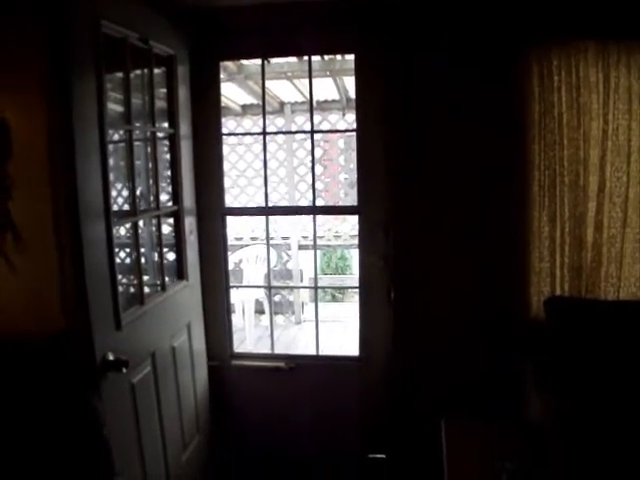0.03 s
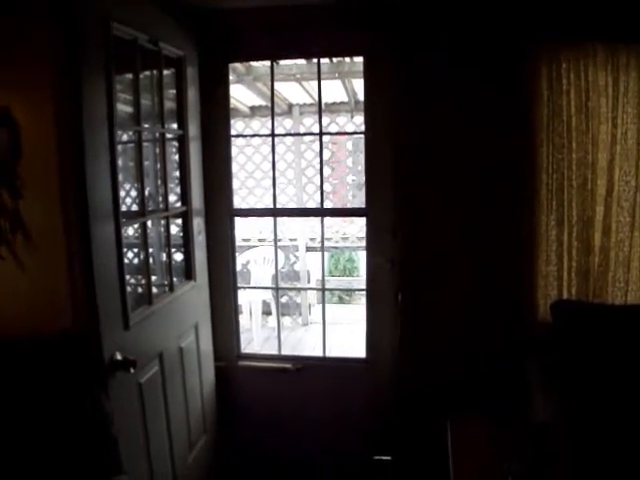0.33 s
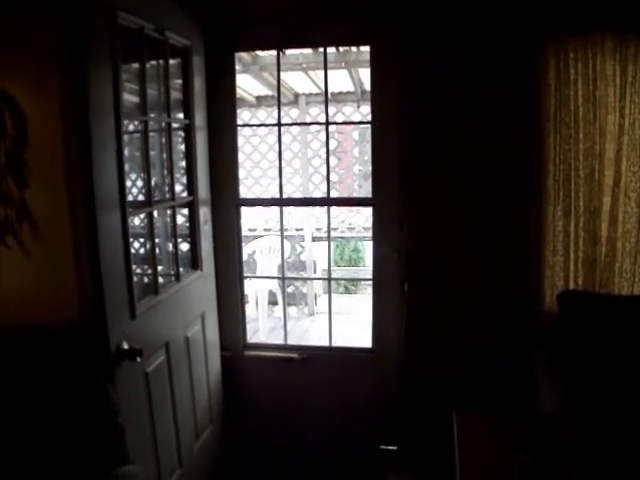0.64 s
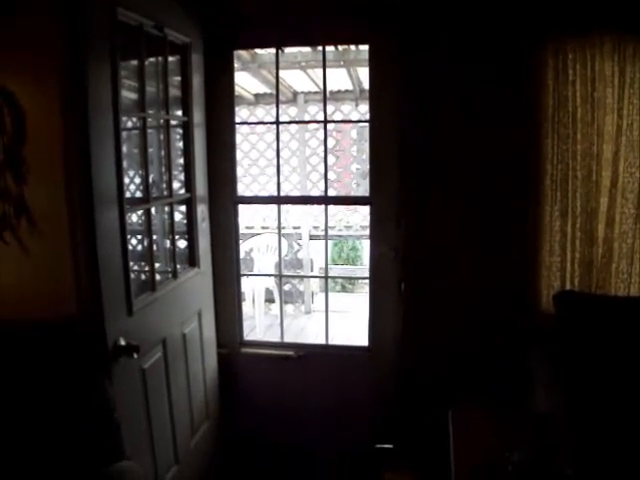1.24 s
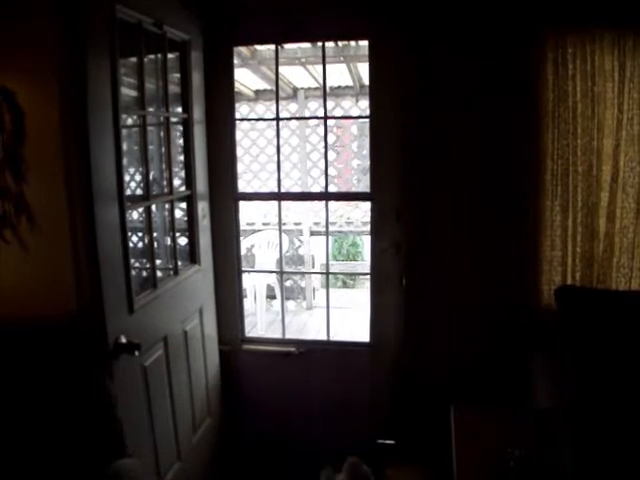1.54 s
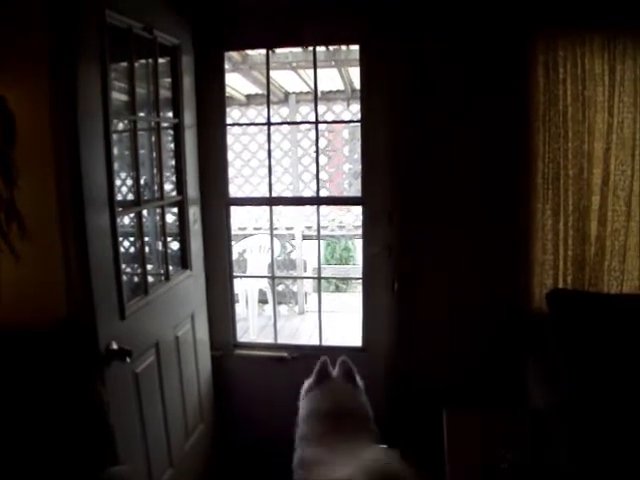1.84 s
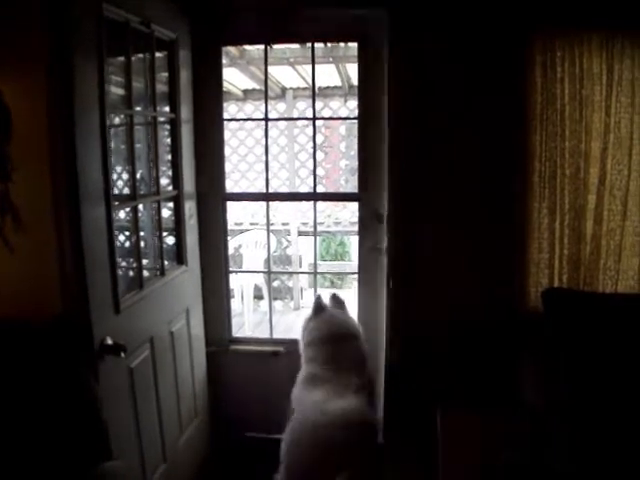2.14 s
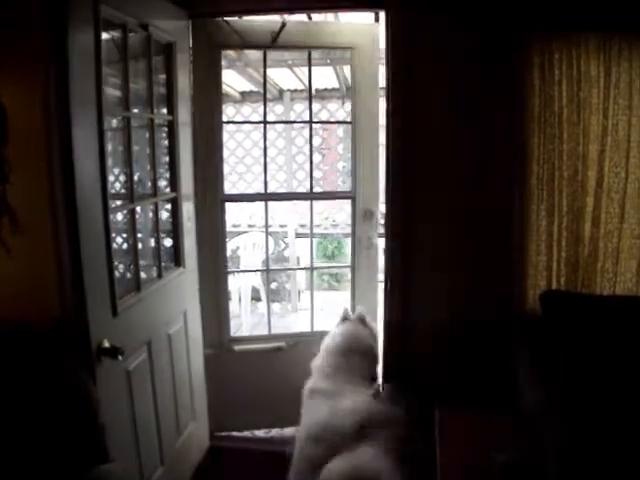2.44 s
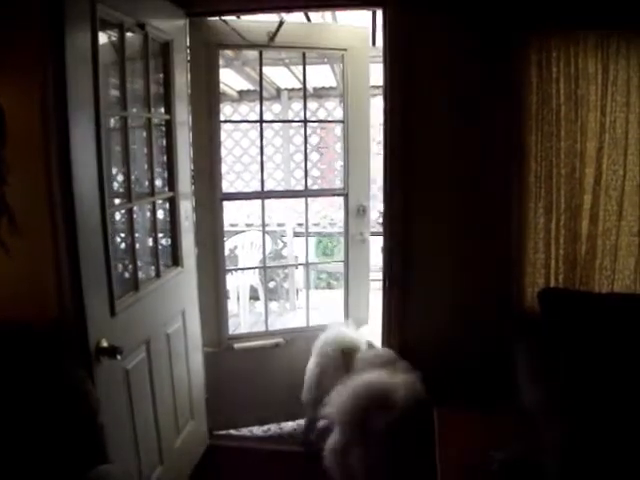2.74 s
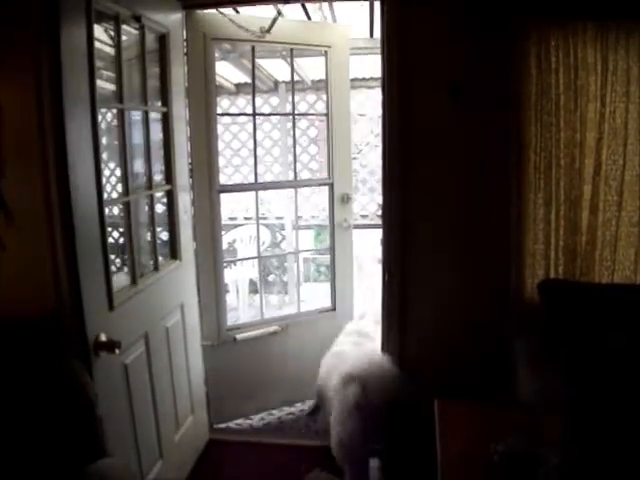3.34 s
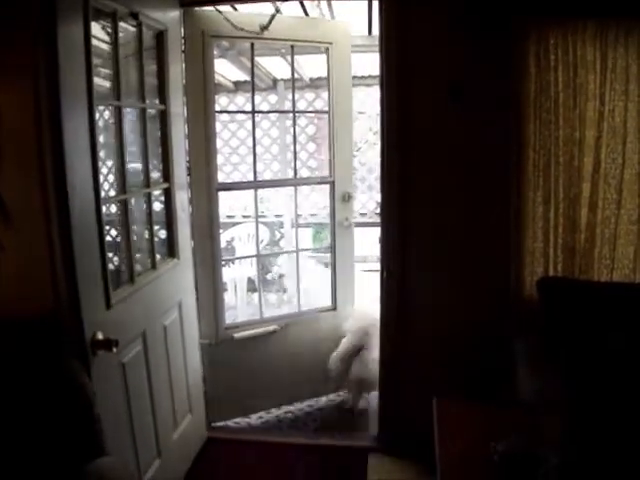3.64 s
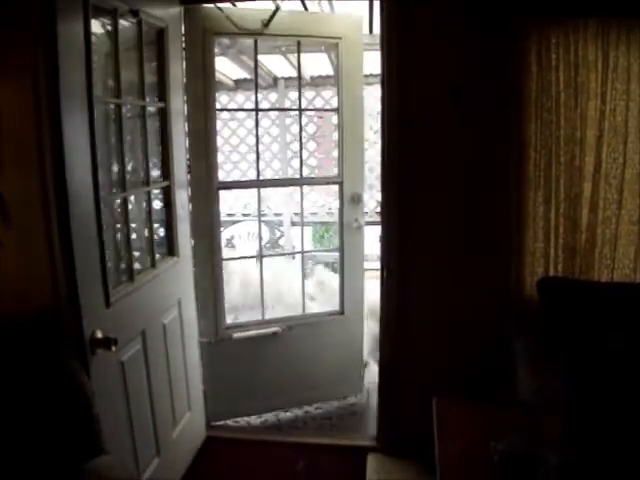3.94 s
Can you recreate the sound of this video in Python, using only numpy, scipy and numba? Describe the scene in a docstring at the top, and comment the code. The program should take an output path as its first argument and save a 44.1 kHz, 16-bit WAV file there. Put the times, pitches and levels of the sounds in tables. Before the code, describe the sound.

A storm door unlatches and rattles as a dog squeezes through, across a quiet room.

```python
"""A dog pushes a glass storm door open and squeezes out, heard from across a quiet room.
First the room's air booms and rumbles, a hand-held camera hisses and ticks, and the dog steps softly.
At 2 s the latch lets go. Frame and pane clack and rattle, the door closer hisses and squeaks, and the
boom rises in pitch as the door opens. Paws scuff the sill. Near 3.6 s a camera button snaps twice.
The sharpest peaks overload the camera."""
import sys
import numpy as np
from scipy import signal
from scipy.fft import rfft, irfft
from scipy.io import wavfile
from scipy.ndimage import uniform_filter1d
from numba import njit

SR = 44100
rng = np.random.default_rng(int(sys.argv[2]) if len(sys.argv) > 2 else 0)


def store_wav(level_fs):
    """Save 16-bit WAV to argv[1]."""
    pcm = np.round(np.clip(np.atleast_2d(level_fs), -1, 1) * 32767)
    wavfile.write(sys.argv[1], SR, pcm.T.astype(np.int16))


N = 176400  # 4 seconds

# The deepest note of the room's air: time_s, pitch_hz, level_db
AIR_NOTE = [(0, 37.97, -23), (.46, 38.63, -16.5), (.8, 38.67, -21.5), (.97, 38.7, -27.5), (1.1, 38, -20),
            (1.34, 38.35, -26), (1.47, 39.2, -15.5), (1.6, 38.15, -34.5), (1.92, 38.44, -17),
            (2.03, 38.4, -26), (2.18, 38.1, -13), (2.35, 38.6, -22), (2.44, 40.99, -14),
            (2.85, 41.58, -11.5), (3.15, 43.33, -14), (3.47, 44.96, -16), (3.6, 46.1, -39),
            (4, 45.4, -29.5)]
# How loud each lasting sound is over time: time_s, level_db
RUMBLE_LEVELS = [(0, -29), (.9, -31.5), (1.15, -21.5), (1.4, -21.5), (1.7, -19), (2, -15.5), (2.5, -20),
                 (3.05, -17), (3.55, -24.5), (3.95, -19)]
DRAUGHT_LEVELS = [(1.9, -23.5), (2.1, -11), (2.4, -15.5), (2.7, -28.5), (2.95, -8.5), (3.4, -24),
                  (4, -26.5)]
CLOSER_LEVELS = [(2.25, -57.5), (2.45, -31.5), (2.6, -31.5), (2.8, -26), (2.94, -46.5), (3.1, -32.5),
                 (3.3, -26.5), (3.45, -46.5), (3.6, -45)]
PUSH_LEVELS = [(0, -47), (1.5, -24), (1.95, -15), (2.05, -3.5), (2.3, -4), (2.5, 0), (2.8, 4.5),
               (2.93, 3.5), (3.25, 2), (3.45, -4.5), (3.65, -6.5), (3.78, -3.5), (4, -7.5)]  # how hard the door is moved

# The tone of each noise, from its lows to its highs: frequency_hz, gain_db
RUMBLE_TONE = [(8, -13), (21, 5.5), (30, -1), (50, -6.5), (75, -10), (110, -30), (200, -28), (400, -48),
               (2000, -87)]
MIC_HISS_TONE = [(60, 5), (130, 5), (210, -11.5), (260, -1), (400, -12.5), (900, -13), (1300, -12.5),
                 (1450, -4), (1600, -6), (2100, 1), (2400, -2.5), (2600, 5), (2800, 1), (2900, -3.5),
                 (3100, -5.5), (3350, -19), (3800, -18.5), (4100, -18), (4700, -17), (5400, -28.5)]
CASE_TONE = [(200, -25), (550, -23.5), (880, -7), (1200, -18), (1500, -3.5), (1900, -6), (2300, 6),
             (2800, -6), (3400, -23.5), (5000, -35)]
STEP_TONE = [(100, -8), (260, -10), (420, -10.5), (650, -8.5), (890, 2), (1100, -1.5), (1500, -8.5),
             (3000, -26)]
SCUFF_TONE = [(100, -7.5), (300, 1), (600, 0.5), (1000, -1.5), (1500, -7), (2700, 6.5), (3500, -5),
              (4500, -11.5), (5400, -17.5)]
CLOSER_TONE = [(1500, -27), (2500, -3.5), (3000, 4), (3600, 2), (4100, -17), (5300, -27.5)]
SHAKE_TONE = [(50, 12), (100, -4), (180, 0), (280, -10.5), (500, -9), (800, -11), (1100, -9.5),
              (1500, -13.5), (2700, -1), (3400, -18.5), (5300, -34.5)]
BOOM_TONE = [(30, -7), (60, -8), (90, 0), (135, 0), (195, -3.5), (260, -7.5), (400, -12.5), (900, -57)]
KNOCK_TONE = [(120, -29), (300, -11), (500, 7.5), (750, 0.5), (1100, 0), (1600, -6), (3000, -20.5)]
RATTLE_TONE = [(600, -31.5), (1000, -18.5), (1500, -14), (2000, -8), (2400, -5), (2800, 1), (3150, -3),
               (3600, -13), (4200, -17.5), (4600, -21.5), (5400, -27.5)]
FRAME_TONE = [(120, -21), (300, -2.5), (520, -6.5), (800, -5), (1100, 1.5), (1700, 7), (2300, 4),
              (3200, -32)]

# Small, short sounds: start_s, level_db
CASE_TICKS = [(.100, -33), (.192, -28.5), (.228, -22), (.358, -22.5), (.426, -32), (0.434, -19),
              (.735, -25), (.836, -23.5), (.988, -28), (1.310, -29), (1.411, -27), (1.677, -27),
              (1.712, -19)]
BUTTON_SNAPS = [(3.6263, 2.5), (3.6334, 2.5)]
PAW_STEPS = [(.100, -32), (.192, -36.5), (.360, -34.5), (.440, -46), (.718, -37.5), (.738, -33.5),
             (.840, -38), (.930, -34.5), (1.310, -31.5), (1.411, -34.5), (1.505, -35.5), (1.572, -30.5),
             (1.612, -27.5), (1.677, -34), (1.805, -31.5), (1.836, -30.5)]
# The notes in one button snap: pitch_hz, level_db, rise_ms
BUTTON_NOTES = [(2320, -10, 1.8), (2562, 0, 1.24), (3140, -13, 1.2), (3830, -21.5, 1.34), (4380, -25, 1),
                (1050, -27.5, 1.5)]
# Paws and fur brushing past: start_s, level_db, length_s
DOG_SCUFFS = [(.93, -34.5, 0.16), (1.565, -39.5, 0.023), (1.599, -33, 0.083), (1.823, -30.5, 0.035),
              (2.005, -28, 0.14), (2.234, -27, 0.028), (3.043, -21.5, .045), (3.373, -23, 0.046),
              (3.447, -28, 0.025), (3.534, -24, 0.053), (3.703, -22.5, 0.024), (3.748, -30, 0.032),
              (3.872, -26, 0.023)]
# Hinge and closer squeaks: start_s, length_s, start_hz, end_hz, level_db
DOOR_SQUEAKS = [(2.069, 0.042, 4110, 4340, -37), (2.215, 0.22, 4630, 4480, -45.5),
                (2.38, 0.16, 3320, 3280, -40), (2.874, 0.022, 4950, 4840, -29)]
# The dog bumping door and floor: start_s, boom_db, knock_db, decay_ms
DOG_BUMPS = [(1.812, -27.5, -42, 18.2), (1.83, -19.5, -33.5, 21.5), (2.441, -17, -27, 28.6),
             (2.710, -18, -13, 15), (2.731, -13, -17.5, 17.5), (2.778, -27.5, -17, 7.7),
             (3.011, -21, -38, 25), (3.213, -28, -23, 34), (3.735, -29, -38, 36), (3.809, -23, -20, 6.8),
             (3.905, -38, -53, 28)]
# Latch, frame and pane clacking: start_s, rattle_db, frame_db, decay_ms
DOOR_CLACKS = [(1.984, -10.5, -15.5, 7.7), (2.014, -22.5, -22, 12), (2.055, -13.5, -25.5, 7.5),
               (2.304, -17.5, -35.5, 7.2), (2.309, -15.5, -28.5, 9.6), (2.333, -20, -39, 15),
               (2.419, -16.5, -49.5, 7), (2.442, -25, -32, 7), (2.449, -15.5, -19, 9),
               (2.560, -21, -45, 16), (2.591, -13.5, -18, 7.6), (2.595, -10, -13.5, 7.3),
               (2.601, -11, -10.5, 18), (2.66, -17, -19, 8.5), (2.663, -15, -25, 10),
               (2.707, -3.5, -28, 16), (2.734, -15, -33, 5.7), (2.744, -7, -33, 15),
               (2.755, -13.5, -21, 9.1), (2.767, -7.5, -36, 8.5), (2.78, -20.5, -35, 6.4),
               (2.789, -6.5, -34, 7.8), (2.794, -12.5, -31, 5.3), (2.851, -5, -18, 3.9),
               (2.858, -11.5, -27, 6.06), (2.881, -15, -26, 10.5), (2.955, -24, -28, 12),
               (2.966, -18.5, -27, 25), (2.994, -23, -36.5, 10), (3.093, -7, -25, 7.4),
               (3.119, -10.5, -44, 13), (3.202, -20, -32, 8), (3.226, -17, -33, 9.9),
               (3.268, -13, -38.5, 13), (3.297, -36, -42, 9), (3.329, -16, -39, 10),
               (3.411, -23, -27.5, 15), (3.73, -21.5, -30.5, 41)]
# The ringing notes of metal frame and pane: pitch_hz, level_db, fade_s (time to fall 60 dB)
DOOR_NOTES = [(487, -12, 0.29), (1073, 1.5, 0.2), (1635, -12, 0.082), (1813, -4, 0.14),
              (1993.3, -4.5, 0.063), (2134, -4, 0.11), (2390, -8, 0.15), (2616, -4.5, 0.17),
              (2870, -5, 0.23), (2940, -0.5, 0.059), (3117, -5, 0.27), (3340, -1, 0.11)]

TIME = np.arange(N) / SR
TAIL_TIME = TIME[:SR // 2]


def undb(db):
    """Turn decibels into a number to multiply by."""
    return 10 ** (np.asarray(db) / 20)


def curve(rows, column=1):
    """Join one column of a table with straight lines over time."""
    rows = np.array(rows)
    return np.interp(TIME, rows[:, 0], rows[:, column])


def colour(sound, tone):
    """Filter a sound with a tone table; white noise keeps its level."""
    size = 8192
    hz, db = np.array(tone).T
    grid_hz = np.arange(size // 2 + 1) * SR / size
    gain = undb(np.interp(np.log(grid_hz + 1), np.log(hz), db))
    gain /= 1 + (grid_hz / 6000) ** 16  # cut the highs
    # Fold the filter so that it never sounds before the hit that drives it.
    folded = irfft(np.log(gain + 1e-7))
    folded[1:size // 2] *= 2
    folded[size // 2 + 1:] = 0
    return excite(sound, irfft(np.exp(rfft(folded))))


def excite(sound, response):
    """Let every sample set off a copy of the response, scaled to an energy of 1."""
    return signal.fftconvolve(sound, response / np.linalg.norm(response))[:N]


def noise(tone):
    """Steady noise with the given tone."""
    return colour(rng.standard_normal(N), tone)


def wander(hz):
    """A random wobble, about 1 in size and mostly slower than hz."""
    grid_hz = np.arange(N // 2 + 1) * SR / N
    wobble = irfft(rfft(rng.standard_normal(N)) / (1 + (grid_hz / hz) ** 4), N)
    return wobble / wobble.std()


def swell(start, length):
    """An arch that rises quickly and falls more slowly."""
    return np.sin(np.pi * np.clip((TIME - start) / length, 0, 1) ** 0.53)


def hits(starts, levels, decay_ms, strike=0):
    """Bursts of chatter that die away; strike adds a sharp click at the start of each."""
    power, clicks = np.zeros(N), np.zeros(N)
    for start_s, db, ms in np.broadcast(starts, levels, decay_ms):
        start = int(start_s * SR)
        age = TIME[:min(N - start, SR // 4)]
        burst = (undb(db) * np.exp(-1000 * age / ms)) ** 2
        power[start:start + len(age)] += burst
        clicks[start] += strike * np.sqrt(burst.sum())
    return (clicks + np.sqrt(power) * rng.standard_normal(N)) / np.hypot(1, strike)


def room(sound, fade_s=0.49, echo_db=-9.5, delay_s=0.005):
    """Add the short echo of a furnished room."""
    fade = np.exp(-np.log(1000) * TAIL_TIME / fade_s)
    echo = rng.standard_normal(len(fade)) * fade * (TAIL_TIME > delay_s)
    return sound + undb(echo_db) * excite(sound, echo)


def air():
    """The room's air booms and rumbles, and the open door lets the pressure swing slowly."""
    boom_gain = np.sqrt(2) * undb(curve(AIR_NOTE, column=2) + 0.6 * wander(12))
    boom = boom_gain * np.sin(2 * np.pi * np.cumsum(curve(AIR_NOTE)) / SR)
    draught = wander(hz=3.5) * undb(curve(DRAUGHT_LEVELS))
    draught -= uniform_filter1d(draught, SR // 2)  # take out the slowest drift
    rumble = noise(RUMBLE_TONE) * undb(curve(RUMBLE_LEVELS))
    return boom + rumble + draught


def camera(hiss_db=-30):
    """The microphone hisses, the case ticks in the hand, and a button snaps down and up."""
    sound = noise(MIC_HISS_TONE) * undb(hiss_db + 1.4 * wander(18))
    starts, levels = np.array(CASE_TICKS).T
    sound += colour(hits(starts, levels, decay_ms=4.5, strike=0.9), CASE_TONE)
    for start, snap_db in BUTTON_SNAPS:
        age = np.maximum(TIME - start, 0)
        for hz, note_db, rise_ms in BUTTON_NOTES:
            rise = 1000 * age / rise_ms
            shape = (rise * np.exp(1 - rise)) ** 1.66
            sound += undb(snap_db + note_db) * shape * np.sin(2 * np.pi * hz * age)
    return sound


def dog():
    """The dog steps softly; paws and fur brush floor, sill and door."""
    starts, levels = np.array(PAW_STEPS).T
    steps = colour(hits(starts, levels, decay_ms=8.8, strike=0.35), STEP_TONE)
    brushing = noise(SCUFF_TONE) * undb(2 * wander(150))
    strokes = sum(undb(db) * swell(start, length) for start, db, length in DOG_SCUFFS)
    return steps + brushing * strokes


def closer(wobble_hz=22):
    """Air leaks from the tube that pulls the door shut, while it and the hinges squeak thinly."""
    sound = noise(CLOSER_TONE) * undb(curve(CLOSER_LEVELS))
    for start, length, start_hz, end_hz, db in DOOR_SQUEAKS:
        hz = np.interp(TIME, [start, start + length], [start_hz, end_hz]) + wobble_hz * wander(200)
        squeak = np.sqrt(2) * np.sin(2 * np.pi * np.cumsum(hz) / SR)
        sound += undb(db) * swell(start, length) * squeak
    return sound


def shaking(taps_per_s=700, spread_db=1.5, level_db=-26.5):
    """The door shakes with tiny random taps, louder the harder it is pushed."""
    is_tap = rng.random(N) < taps_per_s / SR
    sizes = undb(spread_db * np.minimum(rng.exponential(size=N), 4))
    taps = is_tap * sizes * rng.choice([-1, 1], N)
    return colour(taps / taps.std(), SHAKE_TONE) * undb(level_db + curve(PUSH_LEVELS))


def door(ring_db=-18.5):
    """Clacks, dull bumps and shaking set the metal frame and glass pane ringing."""
    starts, rattle_db, frame_db, decay_ms = np.array(DOOR_CLACKS).T
    rattle = colour(hits(starts, rattle_db, decay_ms, strike=0.35), RATTLE_TONE)
    frame = colour(hits(starts, frame_db, decay_ms), FRAME_TONE)
    starts, boom_db, knock_db, decay_ms = np.array(DOG_BUMPS).T
    booms = colour(hits(starts, boom_db, decay_ms), BOOM_TONE)
    knocks = colour(hits(starts, knock_db, decay_ms), KNOCK_TONE)
    vibration = rattle + frame + booms + knocks + shaking()
    ringing = np.zeros(len(TAIL_TIME))
    for hz, db, fade_s in DOOR_NOTES:
        fade = np.exp(-np.log(1000) * TAIL_TIME / fade_s) / np.sqrt(fade_s)
        ringing += undb(db) * fade * np.sin(2 * np.pi * hz * TAIL_TIME)
    return vibration + undb(ring_db) * excite(vibration, ringing)


def scene():
    """Door and dog in the room, with its air and the camera's own noises, in one channel."""
    return (room(door() + closer() + dog()) + air() + camera())[None]


@njit
def follow_level(sound, rise_ms, fall_ms):
    """Track how loud a sound is, with one lag going up and another going down."""
    levels, level = np.empty(len(sound)), 0.
    for i, size in enumerate(np.abs(sound)):
        lag_ms = rise_ms if size > level else fall_ms
        level += (size - level) * 1000 / (lag_ms * SR)
        levels[i] = level
    return levels


def record(dry, limit_db=-5.5, treble_hz=5400, top_hz=16000):
    """The camera cuts the highs and turns loud sounds down, too slowly for sharp peaks, which clip."""
    level = follow_level(dry[0], rise_ms=2.16, fall_ms=12.0)
    limited = dry / np.maximum(level / undb(limit_db), 1)
    dulled = signal.sosfiltfilt(signal.ellip(8, .2, 50, treble_hz, fs=SR, output="sos"), limited)
    clipped = np.clip(dulled, -1, 1)
    return signal.sosfilt(signal.ellip(8, .2, 70, top_hz, fs=SR, output="sos"), clipped)


dry = scene()
out = record(dry)
store_wav(out)
```